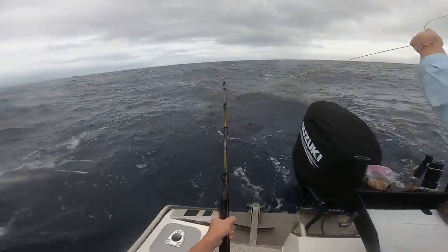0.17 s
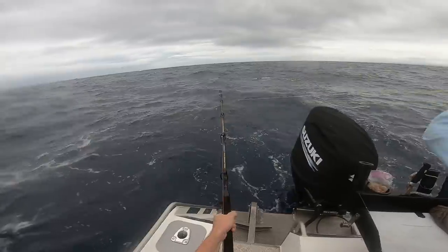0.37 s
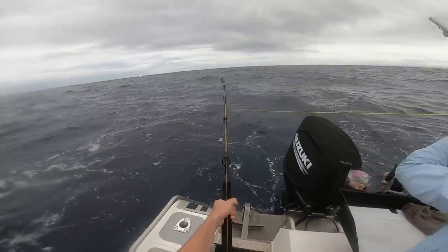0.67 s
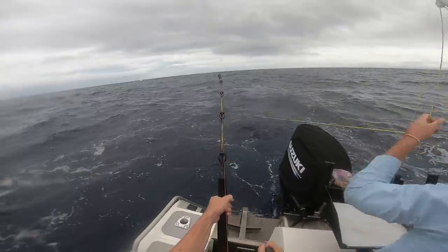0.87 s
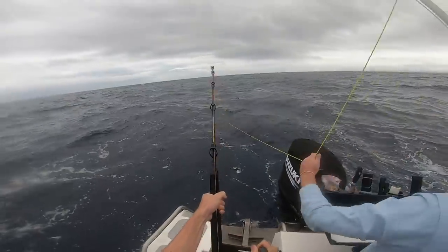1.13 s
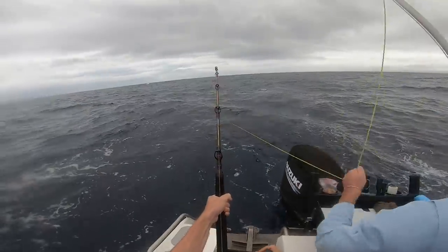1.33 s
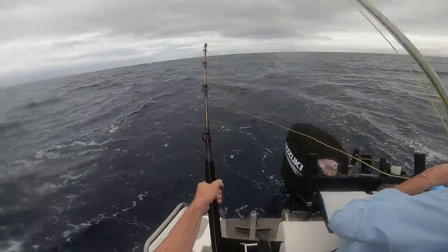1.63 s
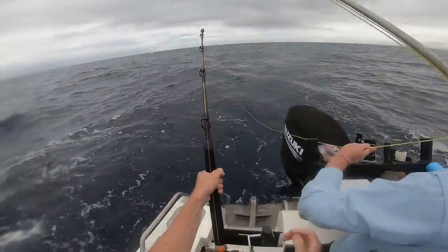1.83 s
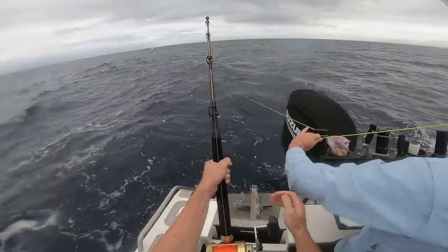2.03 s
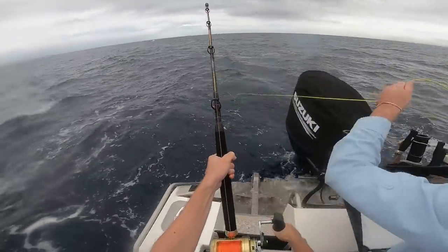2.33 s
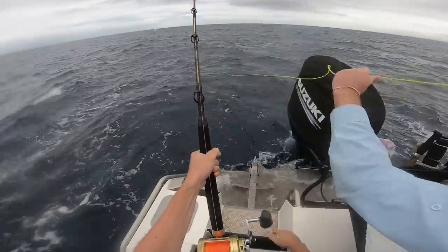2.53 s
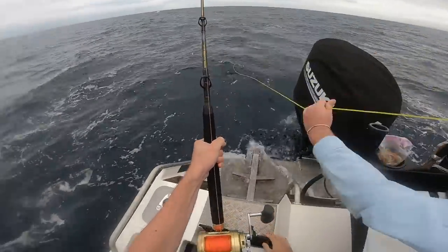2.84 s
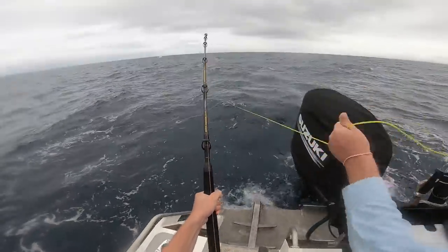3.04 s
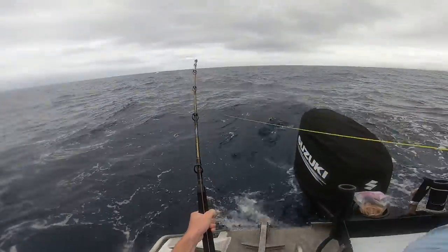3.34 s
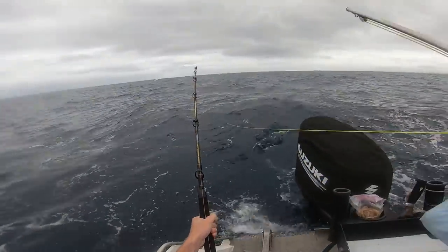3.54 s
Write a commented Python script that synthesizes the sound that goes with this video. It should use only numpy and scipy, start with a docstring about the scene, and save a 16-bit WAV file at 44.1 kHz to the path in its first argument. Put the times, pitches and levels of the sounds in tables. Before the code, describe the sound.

Sea water splashing behind a small fishing boat, with reel ratchet ticks, one sharp click and wind rumble

```python
"""Water sloshes and foams at the stern of a small fishing boat on open sea while a reel's ratchet ticks.
The water is ringing bubbles over coloured hiss; air pockets gurgle and plop in resonances that sink.
Coloured low noise makes the wind on the microphone, and a few sines the faint idling outboard.
The ratchet ticks in short runs as line is pulled off by hand: brief gritty forces ring pawl and housing.
One sharp click and a metal clink are struck as sets of decaying sines."""
import sys
import numpy as np
from scipy import signal
from scipy.fft import rfft, irfft
from scipy.io import wavfile
from scipy.ndimage import uniform_filter1d

SR = 44100
rng = np.random.default_rng(int(sys.argv[2]) if len(sys.argv) > 2 else 0)


def transcribe(u):
    """Save the signal u as a 16-bit wav file named by the first command-line argument.

    u: samples, shape (n,) or (channels, n), limited to [-1, 1]; the rate is SR.
    q: integer samples, one column per channel.
    """
    v = np.clip(np.atleast_2d(u).T, -1, 1)
    q = np.round(v * 32767).astype(np.int16)
    wavfile.write(sys.argv[1], SR, q)


N = 163170

# broad resonances of the reel's pawl, relative levels: (frequency [Hz], width [Hz], level [dB])
PAWL_MODES = [(3537, 170, 2), (4652, 620, -7.5), (5760, 160, -1.5), (6460, 480, -14), (7610, 400, -7.5),
              (8515, 280, 0.5), (9420, 850, -13), (10950, 660, -19.5)]


def from_db(db):
    """Decibels to gain."""
    return 10 ** (np.asarray(db) / 20)


def rms_one(x):
    """Scale to rms 1."""
    return x / np.sqrt(np.mean(x ** 2) + 1e-20)


def seconds():
    """Time of every sample."""
    return np.arange(N) / SR


def level(rows):
    """Gain along a curve of (time [s], level [dB])."""
    return from_db(np.interp(seconds(), *np.transpose(rows)))


def at_hz(points, hz):
    """Read a table on a log-frequency axis."""
    f, v = np.transpose(points)
    return np.interp(np.log(hz + 1e-3), np.log(f), v)


def pan(db):
    """Left and right gains for a level difference; positive leans left."""
    gains = from_db(np.array([[db], [-db]]) / 2)
    return rms_one(gains)


def drift(rate_hz):
    """Slow random curve of rms 1: noise through two equal low-pass poles, drawn at every 40th sample."""
    r = np.exp(-80 * np.pi * rate_hz / SR)
    noise = rng.standard_normal(N // 40 + 2002)
    slow = signal.lfilter([1], [1, -2 * r, r * r], noise)[2000:]  # drop the filter's start
    return np.interp(np.arange(N) / 40, np.arange(len(slow)), rms_one(slow))


def ring(x, hz, t60):
    """A unit click sets a sine of height 1 ringing, 60 dB down after t60 seconds."""
    r = np.exp(-np.log(1000) / (t60 * SR))
    w = 2 * np.pi * hz / SR
    return signal.lfilter([0, np.sin(w)], [1, -2 * r * np.cos(w), r * r], x + 1e-18)


def white():
    """Two unrelated noises."""
    return rng.standard_normal((2, N))


def coloured(pair, colour):
    """Two unrelated signals become left and right, with a colour that falls away past its ends; rms 1."""
    # how alike the two sides are: (frequency [Hz], left-right correlation [-1 to 1])
    likeness = [(150, 0.99), (300, 0.94), (500, 0.47), (1000, -0.68), (1500, 0.53), (2100, 0.87),
                (2700, -0.36), (3400, -0.074), (5000, -0.74), (9000, 0.092)]
    hz = np.arange(N // 2 + 1) * SR / N + 1e-3
    skirts = np.minimum(1, hz / colour[0][0]) ** 2 * np.minimum(1, colour[-1][0] / hz) ** 2
    mid, side = rfft(pair) * from_db(at_hz(colour, hz)) * skirts
    alike = np.clip(at_hz(likeness, hz), -1, 1)
    spectra = np.sqrt(1 + alike) * mid + np.sqrt(1 - alike) * side * [[1], [-1]]
    return rms_one(irfft(spectra, N))


def burst(start, attack, decay):
    """A straight rise over the attack, then an exponential fall with time constant decay."""
    t = seconds() - start
    return np.clip(t / attack, 0, 1) * np.exp(-np.maximum(t - attack, 0) / decay)


def band(x, low_hz, high_hz):
    """Band-pass filter."""
    edges = [low_hz, min(high_hz, SR / 2 - 100)]
    return signal.sosfilt(signal.butter(3, edges, "band", fs=SR, output="sos"), x)


def even(x, span_s):
    """Hold the strength of a noise near 1 over a short span."""
    power = uniform_filter1d(np.mean(x ** 2, axis=0), max(int(span_s * SR), 2))
    return x / np.sqrt(power + 1e-9)


def bubbles(low_hz, high_hz, count=36):
    """Bubbles of random size ring for some cycles, at wandering pitches spread over the band."""
    bubbles_per_s, ring_cycles = 1600, 60  # births on each side; cycles until 60 dB down
    spread_db = 3  # per unit of the exponentially distributed size
    out = np.zeros((2, N))
    for hz in np.geomspace(low_hz, high_hz, count):
        chance = rng.random((2, N))
        born = chance < bubbles_per_s / count / SR
        size = np.minimum(-np.log(chance[born] * count * SR / bubbles_per_s + 1e-12), 4)
        kicks = np.zeros((2, N))
        kicks[born] = from_db(spread_db * size)
        out += np.sqrt(hz) * ring(np.diff(kicks, prepend=0), hz, ring_cycles / hz)
    wander = seconds() + .0015 * drift(4)  # bending time bends the pitches
    return rms_one(np.array([np.interp(wander, seconds(), side) for side in out]))


def deck(x):
    """Short reflections off transom, cowling and deck colour the sound."""
    lags = (np.geomspace(.0019, .0137, 6) * SR).astype(int)
    echoes = sum((-1) ** k * np.pad(x, ((0, 0), (lag, 0)))[:, :N] for k, lag in enumerate(lags))
    return .84 * (x + .27 * echoes)


def wash(grains, colour, hiss_db, patchy_db):
    """Bubbles over a smooth hiss, swelling unevenly."""
    mixed = coloured(grains + from_db(hiss_db) * white(), colour)
    return deck(mixed) * from_db(patchy_db * drift(15))


def swirl(x, edge_hz):
    """Cavities open and close: resonances wander through the sound above a moving lower edge."""
    depth_db, peaks_per_octave = 3.5, 1.7
    hz, s, frames = signal.stft(x, SR, nperseg=512)
    hz = hz[:, None] + 1
    edge = np.interp(s, seconds(), edge_hz)
    wander = np.interp(s, seconds(), 2 * drift(4))
    phase = 2 * np.pi * peaks_per_octave * np.log2(hz) + wander
    gain = from_db(depth_db * np.cos(phase)) / np.sqrt(1 + (edge / hz) ** 10)
    return signal.istft(frames * gain, SR, nperseg=512)[1][:, :N]


def breaking_edge():
    """Each wave breaks thin and deepens as it rolls in: the water's lower edge lifts, then sinks back [Hz]."""
    # moments when the edge is highest: [s]
    breaks = [1, 2.699, 3.28]
    low_hz, lift_hz, deepen_s = 348, 750, 0.14
    lift = np.max([np.exp(-np.abs(seconds() - s) / deepen_s) for s in breaks], axis=0)
    return low_hz + lift_hz * lift


def water():
    """Slosh, churn, foam and spray follow level curves; splashes, gurgles and plops stand out of them."""
    # levels of slosh, deep churn, foam and finest spray, before their trims: (time [s], level [dB])
    slosh_curve, churn_curve = [(0, -50), (.44, -52.5), (.56, -46.5), (.78, -57), (1.03, -68), (1.25, -55),
                                (1.5, -60.5), (1.7, -68), (2.16, -63.5), (2.22, -51), (2.97, -45),
                                (3.7, -51)], [(.5, -57), (1.05, -68.5), (1.42, -63.5), (1.85, -81.5),
                                               (2.04, -63.5), (2.55, -65.5), (2.88, -48.5), (3.07, -51.5),
                                               (3.2, -60), (3.32, -55), (3.7, -54.5)]
    foam_curve, spray_curve = [(0, -57), (.55, -70), (.8, -71.5), (1.6, -87.5), (2.15, -81), (2.24, -63.5),
                               (2.6, -70.5), (2.92, -56), (3.25, -64.5), (3.7, -67)], [(0, -72), (.6, -63.5), (.8, -81.5), (1.35, -72.5), (1.55, -94),
                                             (2.7, -96.5), (3.0, -85), (3.2, -68), (3.7, -70)]
    # relative colours of the four: (frequency [Hz], density [dB per Hz])
    slosh_colour, churn_colour = [(600, -29.5), (1250, -11), (1600, -5), (1900, 1.5), (2150, -8),
                                  (2380, -3.5), (2900, -12), (3400, -10.5), (3900, -26.5), (6000, -47.5)], [(250, -19), (420, -15), (580, 0), (780, 0.5),
                                                        (1100, -1.5), (1400, -2.5), (2200, -28)]
    foam_colour, spray_colour = [(2500, -17), (3600, -3.5), (4100, 0.5), (4700, 5), (5200, 3), (5750, 0),
                                 (6400, -11), (7500, -21.5), (11000, -46.5)], [(4500, -17), (6800, 3), (8100, -10), (8700, -1),
                                                      (9700, -9), (10800, -27.5), (15000, -34)]
    # wavelets against the hull: (time [s], level [dB], decay [s], churn against slosh [dB])
    splashes = [(0.291, -33, 0.033, -5.5), (0.498, -39, 0.077, -6.5), (2.229, -40.5, 0.024, -28),
                (2.724, -39, 0.019, 1), (2.826, -45.5, 0.071, -0.5), (2.943, -34, 0.0031, -5.5),
                (3.013, -29.5, 0.0036, -3)]
    slosh = level(slosh_curve) * from_db(-2.5)
    churn = level(churn_curve) * from_db(-1)
    foam = level(foam_curve) * from_db(-0.5)
    spray = level(spray_curve) * from_db(-2.5)
    for s, db, decay, depth_db in splashes:
        splash = from_db(db) * burst(s, attack=0.0016, decay=decay)
        slosh = np.hypot(slosh, splash)  # powers add
        churn = np.hypot(churn, splash * from_db(depth_db))
    edge = breaking_edge()
    mid_bubbles = bubbles(low_hz=1212.5, high_hz=3656)
    deep_bubbles = bubbles(low_hz=426.2, high_hz=1401, count=20)
    fizz = bubbles(low_hz=3315, high_hz=10000)
    out = slosh * swirl(wash(mid_bubbles, slosh_colour, hiss_db=0.5, patchy_db=1.06), edge)
    out += churn * swirl(wash(deep_bubbles, churn_colour, hiss_db=3, patchy_db=3.0), edge)
    out += foam * swirl(wash(fizz, foam_colour, hiss_db=-0.5, patchy_db=4.0), edge)
    out += spray * wash(fizz, spray_colour, hiss_db=-1.5, patchy_db=0.0)
    return (out + air_pockets()) * pan(db=-4)


def swells(rows, base):
    """Gain of a base curve with bell-shaped swells on top, added as power."""
    t = seconds()
    bells = sum(from_db(db) ** 2 * np.exp(-((t - s) / half) ** 2) for s, db, half in rows)
    return np.sqrt(level(base) ** 2 + bells)


def eddies(colour, even_s):
    """Low turbulence whose strength is held near 1 over a short span."""
    return even(coloured(white(), colour), even_s)


def wind():
    """Gusts rumble and flutter on the microphone as low noise; one deep buffet is a sine in a bell shape."""
    # deep rumble and the flutter above it, before their trims: (time [s], level [dB])
    rumble_curve, flutter_curve = [(.1, -52), (1, -43.5), (1.75, -67), (2.1, -55.5), (2.679, -51),
                                   (3.001, -72), (3.181, -77), (3.25, -49), (3.7, -44.5)], [(0, -51), (1.2, -60.5), (1.9, -65.5), (2.5, -64),
                                                   (2.92, -75.5), (3.18, -61.5), (3.5, -41)]
    # swells of the rumble and of the flutter, before the same trims: (middle [s], level [dB], half length [s])
    gusts, flurries = [(.3, -39, 0.13), (.8, -36.5, 0.069), (1.11, -38, 0.043), (3.69, -36.5, 0.037)], [(.33, -41, 0.058), (.61, -40.5, 0.047), (.78, -50.5, 0.071),
                                      (1.28, -45.5, 0.045), (1.5, -43, 0.036), (2.05, -50.5, 0.04),
                                      (2.34, -46, 0.1)]
    # relative colours: (frequency [Hz], density [dB per Hz])
    rumble_colour, flutter_colour = [(10, -8.5), (22, 2), (38, -1), (60, -5.5), (100, -6.5), (150, -23),
                                     (300, -41)], [(60, -22.5), (120, 3.5), (200, 0.5), (265, 1),
                                                            (320, -15), (430, -20), (900, -30)]
    buffet_s, buffet_hz, buffet_db, width_s = 2.508, 36.5, -21.5, 0.012
    t = seconds() - buffet_s
    bell = np.exp(-(t / width_s) ** 2 / 2)
    buffet = from_db(buffet_db) * bell * np.sin(2 * np.pi * buffet_hz * t)
    rumble = swells(gusts, rumble_curve) * from_db(1.5) * eddies(rumble_colour, even_s=0.16)
    flutter = swells(flurries, flutter_curve) * from_db(-2) * eddies(flutter_colour, even_s=0.12)
    return (rumble + flutter + buffet) * pan(db=-1)


def outboard():
    """Faint hum of the idling engine: a few sines whose phases drift."""
    # partials of the hum: (frequency [Hz], rms level [dB])
    partials = [(91.5, -70.5), (145, -78.5), (264, -79)]
    out = np.zeros(N)
    for hz, db in partials:
        phase = 2 * np.pi * hz * seconds() + 0.2 * drift(4)
        out += from_db(db) * np.sqrt(2) * np.sin(phase)
    return out


def resonate(force, body):
    """Gritty contact force, with random signs, rings in broad resonances and keeps its rms."""
    hz = np.geomspace(body[0][0] * .7, body[-1][0] * 1.3, 200)
    power = sum(from_db(db) ** 2 / (1 + ((hz - f) / width) ** 2) ** 2 for f, width, db in body)
    colour = np.transpose([hz, 10 * np.log10(power)])
    return np.sqrt(np.mean(force ** 2)) * coloured(force * np.sign(white()), colour)


def ratchet():
    """Each tooth scrapes the pawl for an instant; under a hard pull the pawl bounces and the housing rings too."""
    # the pawl drops over a tooth, relative levels: (time [s], level [dB])
    ticks = [(0.0004, -27), (0.0074, -23.5), (0.0191, -31.5), (0.0304, -32), (0.0463, -33), (0.0653, -37),
             (0.0878, -38), (0.11, -33), (0.129, -31), (0.1446, -30.5), (0.1587, -30), (0.173, -29),
             (0.185, -28), (0.1983, -30), (0.2116, -31), (0.2233, -28.5), (0.236, -33), (0.2512, -32.5),
             (0.2678, -33.5), (0.289, -33), (0.326, -34), (0.4631, -37), (0.503, -31.5), (0.5333, -33),
             (0.594, -35.5), (0.9346, -46), (0.999, -51), (1.0555, -38.5), (1.0773, -33), (1.0976, -34.5),
             (1.1195, -33), (1.141, -34.5), (1.1674, -33.5), (1.193, -38.5), (1.2211, -37), (1.255, -40),
             (1.295, -40.5), (1.359, -48.5), (1.768, -60)]
    # how hard the line is pulled, as the share of each tick that shakes the housing: (time [s], level [dB])
    pull_curve = [(0, -0.5), (.56, -1), (.62, -15), (1.1, -24.5)]
    # broad resonances of the housing, relative levels: (frequency [Hz], width [Hz], level [dB])
    housing_modes = [(543, 112, -9.5), (1548, 193, 2.5), (1750, 110, 3.5), (1932, 97, 1.5)]
    attack_s, decay_s, tail_s, tail_db = 0.0016, 0.002, 0.017, -12
    rebound_s, rebound_db = 0.0051, -6.5
    pull = level(pull_curve)
    shape = burst(0, attack_s, decay_s) + from_db(tail_db) * burst(0, attack_s, tail_s)
    s, db = np.transpose(ticks)
    blows = np.zeros(N)
    blows[np.clip(s * SR, 0, N - 1).astype(int)] = from_db(db)
    force = signal.fftconvolve(blows, shape)[:N]
    bounce = from_db(rebound_db) * np.interp(seconds() - rebound_s, seconds(), force * pull, left=0)
    force = np.hypot(force, bounce)
    pawl = band(resonate(force * from_db(-4), PAWL_MODES), low_hz=3140, high_hz=11500)
    housing = resonate(force * pull * from_db(-2.5), housing_modes)
    return pawl * pan(db=1) + housing * pan(db=-2.5)


def click():
    """One hard, dead snap close to the microphone: short modes that reach the right side first."""
    # modes of the snap, before its overall level: (frequency [Hz], level [dB], t60 [s])
    snap_modes = [(1707, -0.5, 0.0087), (2094, 0.5, 0.0052), (3250, 0, 0.0012), (8840, -15, 0.0044)]
    start_s, left_lag_s, snap_db = .3574, .00005, -3
    blow = np.zeros((2, N))
    blow[0, int((start_s + left_lag_s) * SR)] = from_db(snap_db)
    blow[1, int(start_s * SR)] = from_db(snap_db)
    out = np.zeros((2, N))
    for k, (hz, db, t60) in enumerate(snap_modes):
        out += (-1) ** k * from_db(db) * ring(blow, hz, t60)
    return out * pan(db=-7.5)


def clink():
    """A metal fitting clinks and rebounds; each mode arrives with its own phase on each side."""
    # contacts: (time [s], level [dB])
    contacts = [(0.475, -25), (.477, -19.5), (0.4801, -28.5)]
    # modes of the metal, added to the contact level: (frequency [Hz], level [dB], t60 [s])
    metal_modes = [(1934, -16, 0.16), (2340, -6, 0.067), (2800, 2.5, 0.027), (3290, -6, 0.052),
                   (5216, -11.5, 0.029), (7100, -22, 0.23)]
    out = np.zeros((2, N))
    for hz, mode_db, t60 in metal_modes:
        blows = np.zeros((2, N))
        for s, db in contacts:
            starts = s + rng.random(2) / hz  # up to one cycle late
            blows[[0, 1], (starts * SR).astype(int)] = from_db(db + mode_db)
        out += ring(blows, hz, t60)
    scrape = burst(contacts[0][0], attack=.002, decay=0.0069)
    grit = from_db(-27.5) * resonate(scrape, PAWL_MODES)
    return band(out + grit, low_hz=1700, high_hz=11000)


def sinking(s, hz):
    """Phase of a resonance that passes through a pitch at a given moment and sinks."""
    octaves_per_s = 2.8  # within 0.1 s of that moment; the pitch is steady outside
    octaves = -octaves_per_s * np.clip(seconds() - s, -.1, .1)
    return 2 * np.pi * np.cumsum(hz * 2 ** octaves) / SR


def air_pockets():
    """Clusters of bubbles gurgle in a narrow, sinking resonance; single large bubbles plop as sinking sines."""
    # pockets of air at the transom: (time [s], resonance [Hz], level [dB], decay [s])
    gurgles = [(.686, 1818, -41.5, 0.029), (.8, 1820, -51, 0.033), (1.335, 2394, -55, 0.1),
               (1.412, 1528, -52, 0.033), (2.183, 2107, -43.5, 0.056), (2.563, 2314, -48.5, 0.068),
               (2.654, 1856, -48, 0.028), (3.305, 1901, -37, 0.042), (3.662, 1575, -44, 0.02)]
    # single large bubbles: (time [s], pitch [Hz], level [dB])
    plops = [(.86, 1090, -52.5), (1.378, 1150, -51.5), (1.46, 260, -41.5), (1.558, 2330, -53.5),
             (2.048, 275, -43.5), (2.792, 870, -51), (3.05, 430, -48), (3.23, 1640, -49),
             (3.626, 2470, -37)]
    lowpass = signal.butter(2, 172, fs=SR, output="sos")  # Hz either side of the resonance
    a, b = even(signal.sosfilt(lowpass, white()), span_s=.015)
    out = np.zeros(N)
    for s, hz, db, decay in gurgles:
        phase = sinking(s, hz)
        narrow_noise = a * np.cos(phase) + b * np.sin(phase)
        out += from_db(db) * burst(s, attack=.005, decay=decay) * narrow_noise
    for s, hz, db in plops:
        out += from_db(db) * burst(s, attack=0.006, decay=0.015) * np.sin(sinking(s, hz))
    return out


def scene():
    """Everything as it reaches the microphone worn by the angler."""
    return water() + wind() + outboard() + ratchet() + click() + clink()


def record(dry):
    """The top of the spectrum is cut, 70 dB down from 15.7 kHz up."""
    return signal.sosfilt(signal.cheby2(12, 70, 15700, fs=SR, output="sos"), dry)


dry = scene()
out = record(dry)
transcribe(out)
```